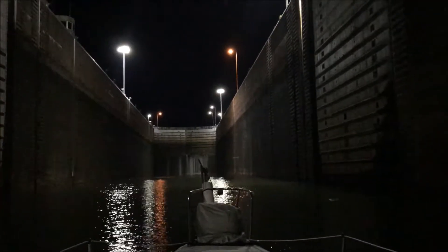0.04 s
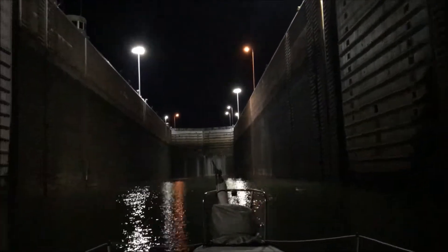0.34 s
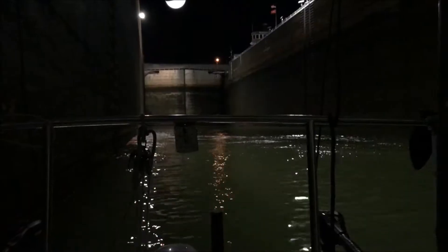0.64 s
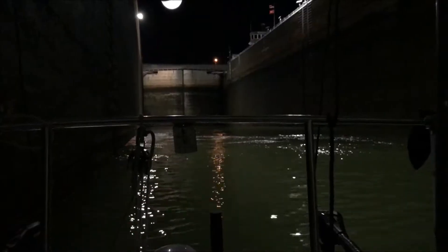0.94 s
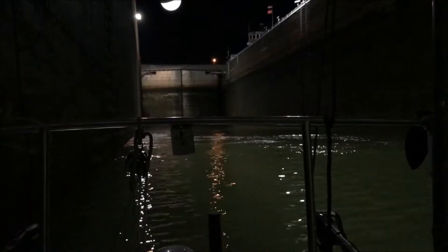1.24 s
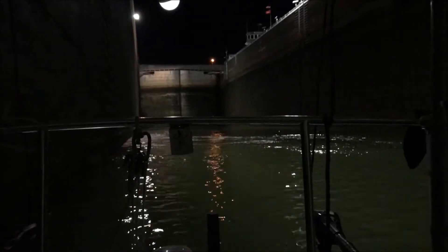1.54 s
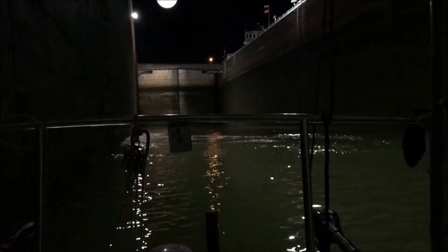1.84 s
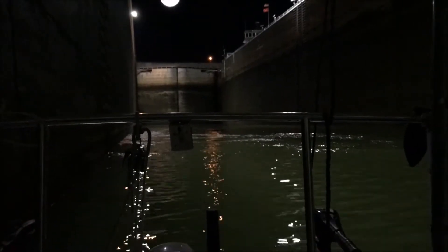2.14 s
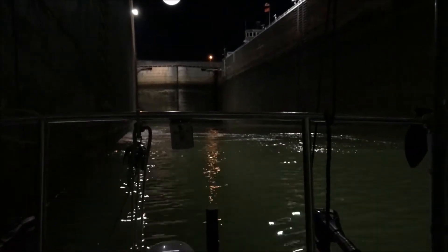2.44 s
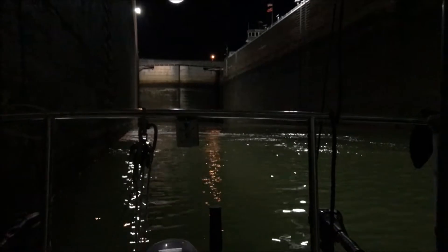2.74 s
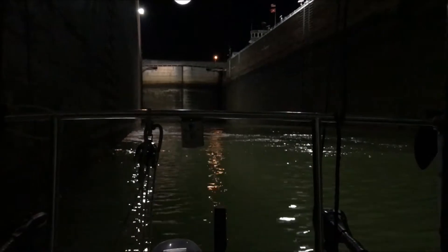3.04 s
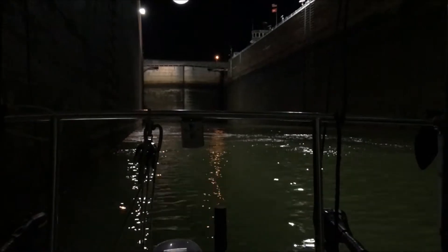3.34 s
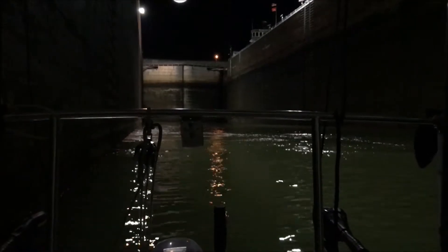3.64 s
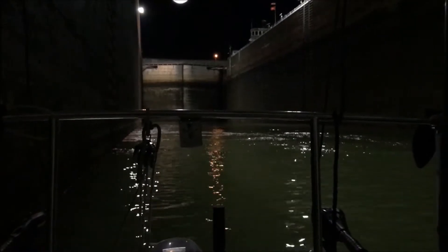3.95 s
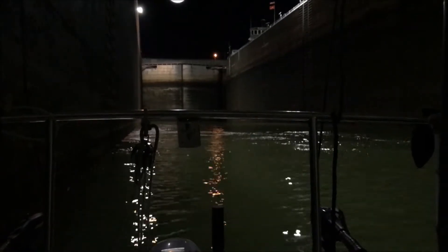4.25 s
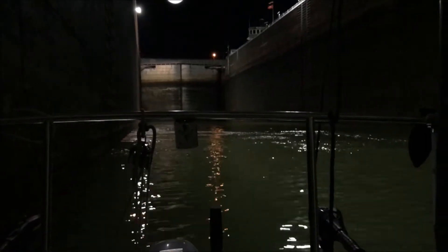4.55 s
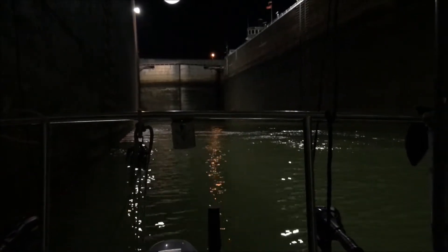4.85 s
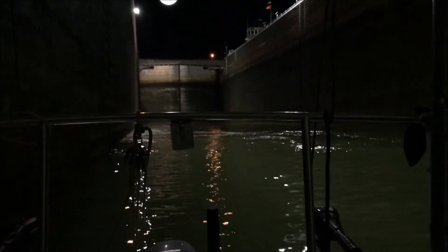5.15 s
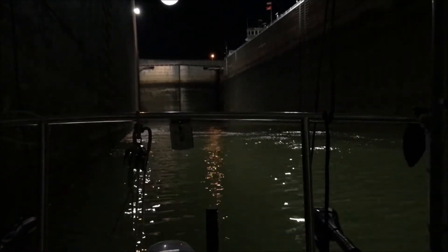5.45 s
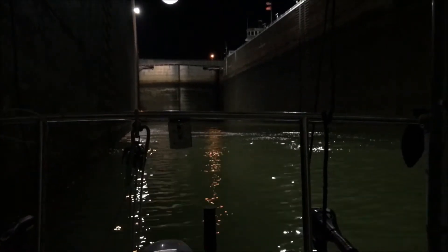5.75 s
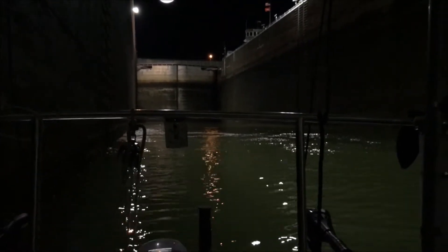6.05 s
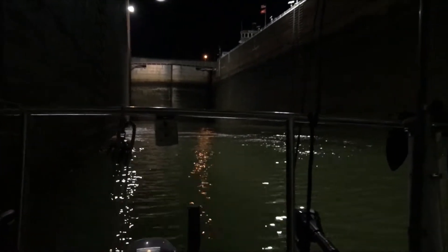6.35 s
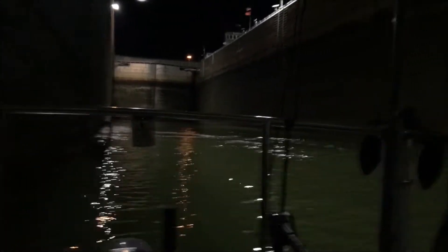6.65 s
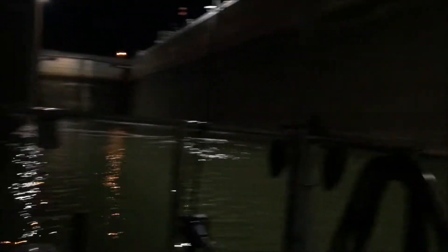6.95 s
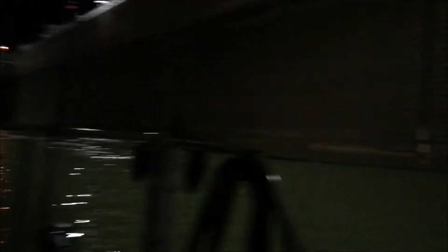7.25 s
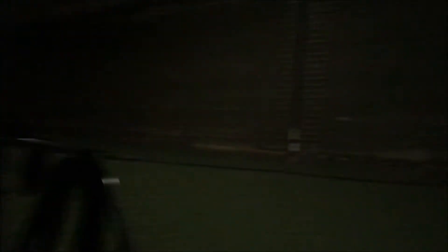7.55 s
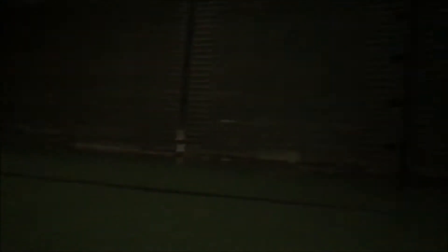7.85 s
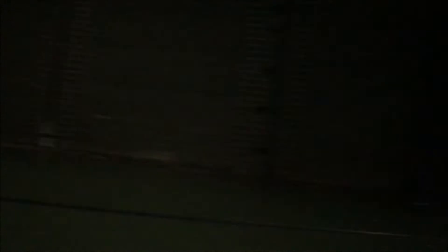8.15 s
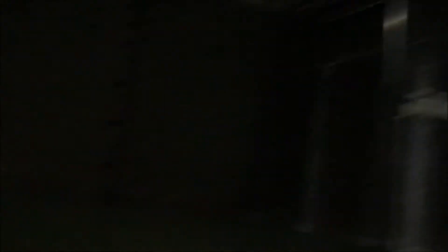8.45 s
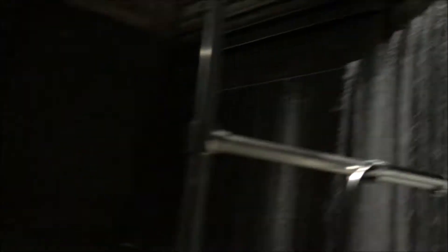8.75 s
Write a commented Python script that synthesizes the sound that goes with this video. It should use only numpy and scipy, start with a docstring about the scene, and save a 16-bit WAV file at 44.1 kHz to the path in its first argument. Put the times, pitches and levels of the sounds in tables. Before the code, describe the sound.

Dense, booming water churns in a concrete lock chamber, then spray hiss swells, with a microphone bump and brief wind buffeting.

```python
"""A booming rush of water cuts in after half a second of silence, heard from a boat at night.
The water pours into a concrete lock chamber, where it churns, bubbles and echoes between the walls.
Near 8 s the camera turns to the falling water and the hiss of spray swells, highest sounds first.
One bump makes the camera thump and shake; then gusts of wind buffet and rumble at its microphone."""
import sys
import numpy as np
from scipy import signal
from scipy.fft import rfft, irfft, next_fast_len
from scipy.io import wavfile

SR = 44100
rng = np.random.default_rng(int(sys.argv[2]) if len(sys.argv) > 2 else 0)


def wav_record(signal):
    """Record a signal, one row per channel, as 16-bit PCM in the file named by sys.argv[1]."""
    frames = np.transpose(np.atleast_2d(signal))
    bounded = np.clip(frames, -1, 1)
    # unit amplitude maps onto the largest positive 16-bit level
    quanta = np.round(bounded * 32767).astype(np.int16)
    wavfile.write(sys.argv[1], SR, quanta)


N = 392490
TIME_S = np.arange(N) / SR
TURN_S, TURN_LENGTH_S = 7.92, 1.45  # the middle of the camera's turn, and roughly how long it takes

# How strong the churning water is, from low to high. Columns: pitch_hz, level_db
RUSH_TONE = [(22, -24), (32, -12), (45, -8), (72, -0.5), (105, -2), (130, -4), (150, -4.5), (240, -2),
             (490, -8), (700, -5.5), (850, -5), (1100, -1), (1650, -3), (2300, -7.5), (4000, -13.5),
             (16000, -50)]
# Pitches at which the chamber and the boat boom. Columns: pitch_hz, width_hz, boost_db
CHAMBER_BOOMS = [(92, 17, 4), (166, 17, 4), (236, 24, 0.7), (290.4, 14, 5), (403.5, 56, 6), (654, 26, 3),
                 (906, 24, 3), (1003, 40, 3.5), (1083, 28, 1.2), (1620, 45, 2)]
def water_rush(level_db=-33.5, turn_boost_db=1.04, wall_s=7.52, wall_length_s=0.42):
    """Churning water booms in the chamber. It comes from all round, so turning adds only a little."""
    water = churn(patchy_db=1.9, patch_s=0.042, patch_hz=69.5, surge_db=0.63, surge_s=0.022)
    gurgle = bubbles(per_s=900, low_hz=451.6, high_hz=2957, cycles=16.6, rise=0.0166, pitches=32)
    water = water + gain_of(-16.5) * gurgle
    water = unit_level(filtered(water, lambda hz: curve(RUSH_TONE, hz) + bumps(CHAMBER_BOOMS, hz)))
    # A side wall throws the middle pitches back as the camera sweeps past it.
    wall = filtered(water, lambda hz: bump(hz, pitch_hz=1150, width_hz=850, db=2.0)) - water
    passing = np.exp(-(2 * (TIME_S - wall_s) / wall_length_s) ** 2)
    return (water + passing * wall) * gain_of(level_db + turn_boost_db * turned(TURN_S, TURN_LENGTH_S))


# How strong the spray is where the water lands, from low to high. Columns: pitch_hz, level_db
SPRAY_TONE = [(200, -26), (600, 7), (1200, -1), (2300, -0.9), (3500, 0.4), (6200, 0.9), (9000, -1.4),
              (12500, -3.5), (15800, -7)]
def spray_hiss(level_db=-38, body_boost_db=9, top_boost_db=6.5, top_hz=8000):
    """Countless drops and tiny bubbles blend into a hiss that swells as the camera turns to it."""
    drops = churn(patchy_db=1.5, patch_s=0.035, patch_hz=90, surge_db=0.45, surge_s=0.022)
    fizz = bubbles(per_s=9000, low_hz=2500, high_hz=15800, cycles=40, rise=0.008, pitches=120)
    hiss = unit_level(filtered(drops + gain_of(-10) * fizz, lambda hz: curve(SPRAY_TONE, hz)))
    top = filtered(hiss, lambda hz: -20 * np.log10(1 + (top_hz / (hz + 1)) ** 4))
    body = hiss - top
    body_swell = gain_of(body_boost_db * turned(TURN_S, TURN_LENGTH_S))
    # The top of the hiss depends more on where the microphone points, so it swells faster.
    top_swell = gain_of(top_boost_db * turned(halfway_s=7.62, length_s=0.52))
    return gain_of(level_db) * (body * body_swell + top * top_swell)


# The notes the camera's case rings with. Columns: pitch_hz, level_db, ring_s (time to fade by 60 dB)
CASE_NOTES = [(131, -6.5, 0.04), (249, 7.5, 0.024), (340, -7, 0.022), (490, 1.5, 0.026), (865, -7, 0.02)]
# Short low thumps at the microphone: first a bump, then buffeting within the wind gusts.
# Columns: start_s, peak_db, low_boost_db, high_boost_db
LOW_THUMPS = [(8.002, -23, 0, -6), (8.0064, -21, -1, -8), (8.01, -19.5, 1, 5), (8.0148, -25, -4, -2),
              (8.028, -30, -7, -8), (8.0562, -25.5, -9, -6), (8.064, -25, -9, -9), (8.0785, -30, -3, -6),
              (8.4865, -26, 6, 11), (8.491, -20, 8, 14), (8.4985, -24, 14, 14), (8.5056, -20, 21, 11),
              (8.5136, -24, 23, 8), (8.5215, -25, 17, 8), (8.5477, -24, 0, -4), (8.5552, -24.5, 0, -6),
              (8.568, -23.5, 14, -7), (8.5827, -27, 10, -4), (8.6086, -24, 9, -8), (8.625, -30, 16, -3),
              (8.6745, -28, 17, -4), (8.69, -20.5, 0, -10), (8.6995, -22, 6, -2), (8.7063, -24, 8, -2),
              (8.7135, -27, 6, -4), (8.7325, -26, 12, -4), (8.7395, -30, 6, -2), (8.76, -28, 14, -2),
              (8.768, -28, 8, -3), (8.783, -27, 0, -6), (8.8238, -23.5, 7, -1), (8.830, -27, 0, -2),
              (8.841, -27, 8, -4)]
def low_thumps(attack_s=0.00086):
    """Each thump is a few fast-fading notes: dull ones favour the lowest, sharp ones the high notes."""
    out = np.zeros(N)
    age = TIME_S[:SR // 2]
    for start_s, peak_db, low_boost_db, high_boost_db in LOW_THUMPS:
        thump = np.zeros_like(age)
        for hz, level_db, ring_s in CASE_NOTES:
            note_db = level_db + low_boost_db * (hz < 180) + high_boost_db * (hz > 300)
            thump += gain_of(note_db - 60 * age / ring_s) * np.sin(2 * np.pi * hz * age)
        thump *= 1 - np.exp(-age / attack_s)
        thump *= gain_of(peak_db) / abs(thump).max()
        out += np.interp(TIME_S - start_s, age, thump, left=0, right=0)
    return out


# The rumble of wind at the microphone. Columns: pitch_hz, level_db
RUMBLE_TONE = [(20, -39), (50, -25), (75, -10), (140, 9), (178, -3), (220, 8.5), (255, 0), (300, 3.5),
               (370, -7), (600, -22), (1500, -49), (5000, -70)]
# The whoosh of its smaller swirls. Columns: pitch_hz, level_db
WHOOSH_TONE = [(100, -30), (250, -13), (410, 6), (540, -3), (760, -16), (3000, -50)]
# Gusts of wind. Columns: start_s, length_s, level_db, whoosh_db (compared with the rumble)
WIND_GUSTS = [(8.473, 0.052, -31, -4.5), (8.537, 0.085, -34.5, -26), (8.655, 0.2, -32, -20)]
def wind_gusts(attack_s=0.015, sag_db_per_s=-11, release_s=0.026):
    """Air swirls at the microphone in short, lumpy rumbles; a sharp gust adds a whoosh."""
    out = np.zeros(N)
    swirls = unit_level(random_clicks(per_s=770, spread_db=-0.5)) + rng.standard_normal(N)
    rumble = unit_level(filtered(swirls, lambda hz: curve(RUMBLE_TONE, hz)))
    whoosh = unit_level(filtered(rng.standard_normal(N), lambda hz: curve(WHOOSH_TONE, hz)))
    for start_s, length_s, level_db, whoosh_db in WIND_GUSTS:
        age = np.maximum(TIME_S - start_s, 0)
        fade_in = np.minimum(age / attack_s, 1)
        strength = gain_of(level_db + sag_db_per_s * age)
        fade_out = np.exp(-np.maximum(age - length_s, 0) / release_s)
        out += fade_in * strength * fade_out * (rumble + gain_of(whoosh_db) * whoosh)
    return out


# The deep flutter of the shaking camera. Columns: pitch_hz, level_db
FLUTTER_TONE = [(15, -30), (38, -1), (80, -2), (300, -60)]
def camera_shake(start_s=7.998, level_db=-39, attack_s=0.008, settle_s=0.9):
    """The bumped camera flutters in the hand and settles."""
    age = np.maximum(TIME_S - start_s, 0)
    flutter = unit_level(filtered(rng.standard_normal(N), lambda hz: curve(FLUTTER_TONE, hz)))
    return flutter * np.minimum(age / attack_s, 1) * gain_of(level_db - 60 * age / settle_s)


def churn(patchy_db, patch_s, patch_hz, surge_db, surge_s):
    """Clouds of bubbles make a noise that comes and goes in patches, while the whole flow surges."""
    grid = signal.stft(rng.standard_normal(N), nperseg=1024, noverlap=768)[2].T  # time by pitch
    patches = patchy_db * drift(grid.shape, patch_s, patch_hz)
    surges = surge_db * drift(grid.shape, surge_s, SR)
    grid = grid * gain_of(patches + surges)
    return unit_level(signal.istft(grid.T, nperseg=1024, noverlap=768)[1][:N])


def bubbles(per_s, low_hz, high_hz, cycles, rise, pitches):
    """Each bubble rings briefly and slides up in pitch as it nears the surface."""
    out = np.zeros(N)
    for hz in np.geomspace(low_hz, high_hz, pitches):
        age = np.arange(0, 5, hz / cycles / SR)  # one unit of age lasts cycles / hz seconds
        ring = np.exp(-age) * np.sin(2 * np.pi * cycles * age * (1 + rise * age))
        starts = random_clicks(per_s / pitches, spread_db=4)
        out += signal.oaconvolve(starts, ring * hz / low_hz)[:N]
    return unit_level(out)


def random_clicks(per_s, spread_db):
    """Clicks at random times and of random sizes, each a push or a pull."""
    draw = rng.random(N) * SR / per_s
    at, clicks = np.flatnonzero(draw < 1), np.zeros(N)
    clicks[at] = (-1) ** at * gain_of(spread_db * np.minimum(-np.log(draw[at]), 4))
    return clicks


def drift(shape, span_s, span_hz):
    """Smooth random ups and downs over time and pitch, in patches of a given length and width."""
    along = np.fft.fftfreq(shape[0], 256 / SR)[:, None] * span_s
    across = np.fft.rfftfreq(shape[1], SR / 1024) * span_hz
    blur = np.exp(-np.pi * (along ** 2 + across ** 2))
    return unit_level(np.fft.irfft2(np.fft.rfft2(rng.standard_normal(shape)) * blur, shape))


def turned(halfway_s, length_s):
    """How far the camera has turned to the falling water, easing from 0 to 1."""
    return 0.5 + 0.5 * np.tanh(2 * (TIME_S - halfway_s) / length_s)


def filtered(sound, db_at):
    """Turns each pitch up or down by the decibels that db_at gives for it."""
    size = next_fast_len(N + SR // 2)
    gains = gain_of(db_at(np.fft.rfftfreq(size, 1 / SR)))
    return irfft(rfft(sound, size) * gains, size)[..., :N]


def curve(points, hz):
    """Joins the points of a tone table to give a level in dB at any pitch."""
    pitch_hz, level_db = np.transpose(points)
    return np.interp(np.log(hz + 1), np.log(pitch_hz + 1), level_db)


def bump(hz, pitch_hz, width_hz, db):
    """A rounded peak or dip around one pitch, width_hz wide at half its height."""
    return db * 2 ** -((2 * (hz - pitch_hz) / width_hz) ** 2)


def bumps(rows, hz):
    """Several peaks or dips added up, in dB."""
    return sum(bump(hz, *row) for row in rows)


def gain_of(db):
    """Turns decibels into a number to multiply by."""
    return 10 ** (np.asarray(db) / 20)


def unit_level(x):
    """Scales a signal so that its average strength (rms) is 1."""
    return x / np.sqrt(np.mean(x ** 2) + 1e-20)


def scene():
    """Water all round, with thumps and wind right at the microphone; left and right are the same."""
    mix = spray_hiss() + water_rush() + low_thumps() + wind_gusts() + camera_shake()
    return np.tile(mix, (2, 1))


# Narrow ranges of pitch that the camera's case weakens. Columns: pitch_hz, width_hz, change_db
CASE_DIPS = [(4940, 290, -3.5), (7700, 820, -2.5), (10470, 790, -4)]
def record(dry):
    """The case dulls a few pitches, the deepest and highest are lost, and the sound starts abruptly."""
    start_s, low_cut_hz, high_cut_hz = 0.538, 32, 15800
    heard = filtered(dry, lambda hz: bumps(CASE_DIPS, hz) - 10 * np.log10(1 + (low_cut_hz / (hz + 1)) ** 8))
    heard = heard * (TIME_S >= start_s)
    high_cut = signal.firwin(1023, high_cut_hz, window=("kaiser", 9), fs=SR)
    return signal.oaconvolve(heard, high_cut[None], "same", axes=1)


dry = scene()
out = record(dry)
wav_record(out)
```